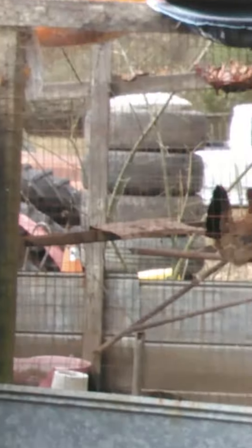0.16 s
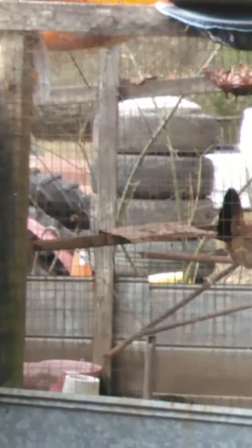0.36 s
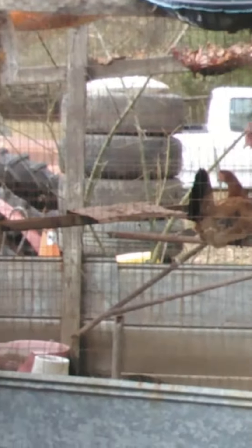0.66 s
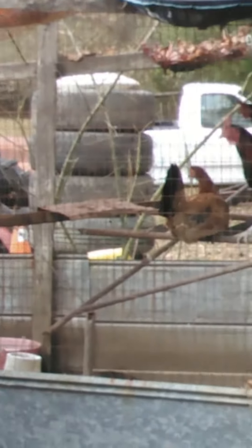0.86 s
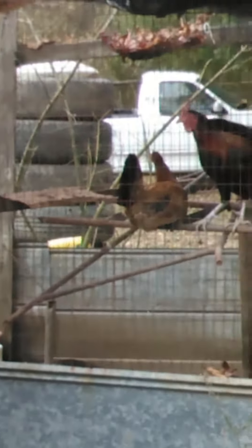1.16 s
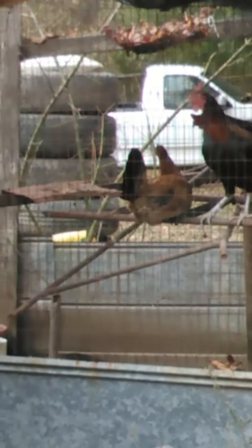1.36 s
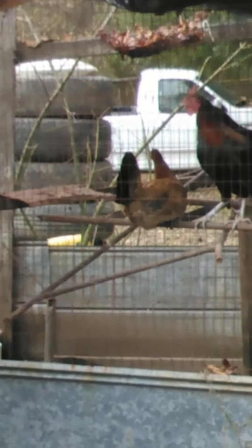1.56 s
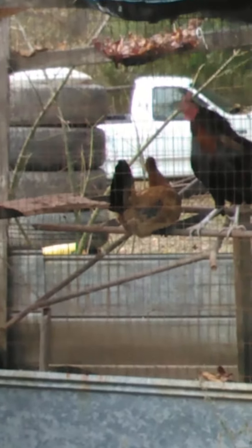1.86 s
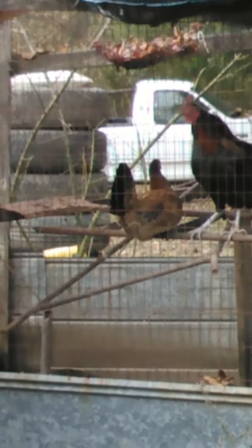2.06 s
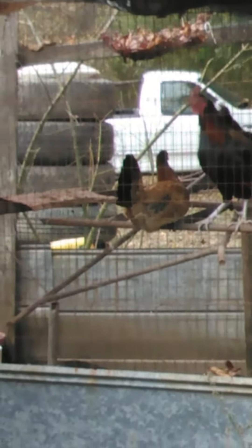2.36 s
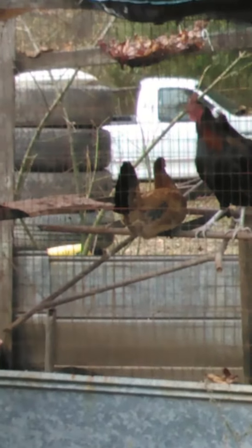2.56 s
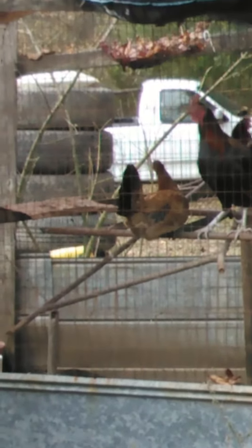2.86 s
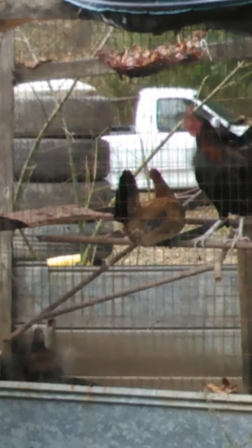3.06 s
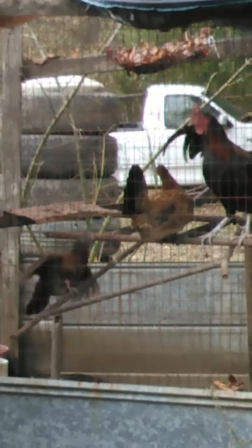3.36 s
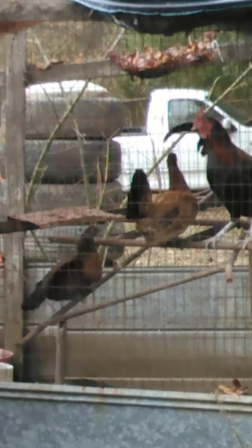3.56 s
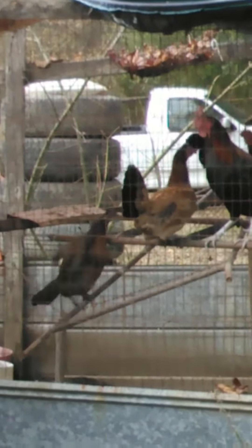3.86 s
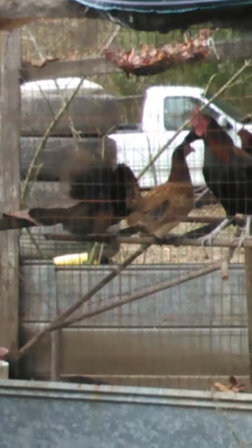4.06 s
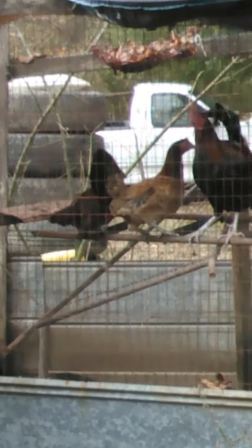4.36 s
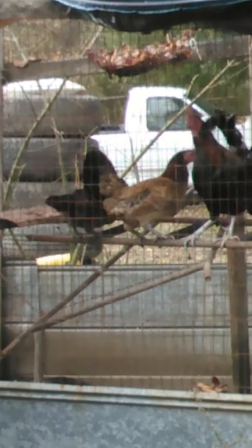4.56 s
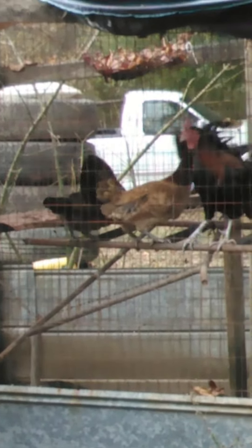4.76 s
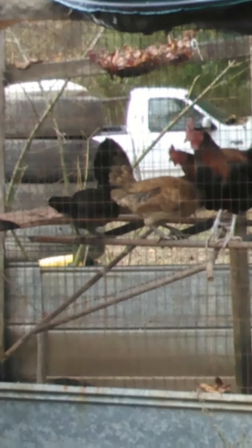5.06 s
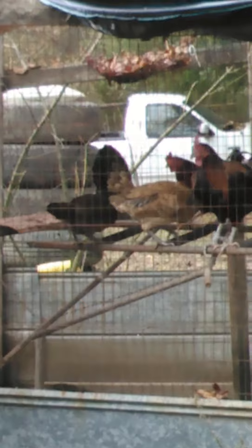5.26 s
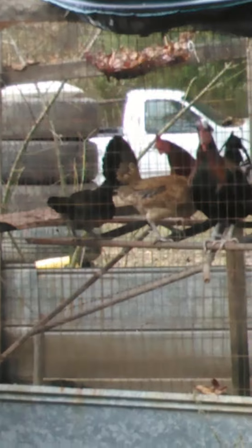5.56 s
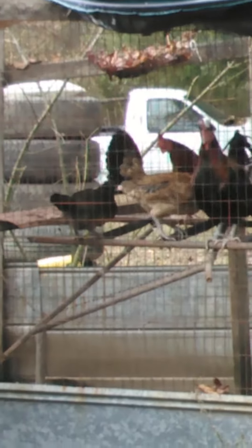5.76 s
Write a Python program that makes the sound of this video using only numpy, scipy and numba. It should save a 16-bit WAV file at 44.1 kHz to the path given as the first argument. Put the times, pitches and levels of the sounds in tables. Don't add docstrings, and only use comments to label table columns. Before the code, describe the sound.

Hens in an open wire coop with metal sides: after initial silence, hoarse flock calls and a close cackle, a long rising squawk, rustling feathers and steady clucks. A longer sinking squawk follows with a yelp and soft wing beats, then a last squawk bout, clucks and a claw knock. Phone microphone, dull treble, slight distortion, short metallic reverberation.

```python
import sys
import numpy as np
from scipy import signal
from scipy.io import wavfile
from scipy.ndimage import uniform_filter1d
from numba import njit

SR = 44100
rng = np.random.default_rng(int(sys.argv[2]) if len(sys.argv) > 2 else 0)


def int16_out(signal):
    q = np.round(np.clip(np.atleast_2d(signal).T, -1, 1) * 32767)
    wavfile.write(sys.argv[1], SR, q.astype(np.int16))


N = 261072
START_S = 0.468
PITCH_SAG = 0.04

# time in seconds, pitch in Hz, level in dB.
MOTOR_HUM = [(0.46, 85.3, -75), (0.49, 90.9, -36.5), (1.6, 90.8, -30.5), (3.48, 84.8, -60.5),
             (5.19, 90.8, -59.5), (5.72, 83.7, -59.5), (5.92, 100, -52)]
# multiple of the pitch, level in dB.
MOTOR_TONES = [(1, -3), (2, -21.5)]
# time in seconds, level in dB.
WIND_LEVEL = [(0.46, -45), (0.52, -37.5), (1.78, -36), (2.33, -43.5), (5.16, -41), (5.26, -39),
              (5.48, -39.5), (5.92, -41.5)]
# frequency in Hz, density in dB per Hz.
WIND_SPECTRUM = [(12, -25), (20, -38), (42, -7), (59, 2), (72, 0.5), (172, -11), (247, -7.5), (300, 5),
                 (390, -61.5), (660, -120)]
# time in seconds, level in dB.
YARD_LEVEL = [(.46, -31), (1.0, -36.5), (1.6, -39), (2.08, -52.5), (2.7, -52.5), (3.3, -40), (3.5, -38),
              (3.7, -40.5), (4.12, -52), (4.8, -46.5), (5.4, -53.5), (5.92, -52.5)]
# frequency in Hz, density in dB per Hz.
YARD_SPECTRUM = [(88, -59), (150, 1), (469, -4), (796, -3), (1440, -5), (1750, -17.5), (2120, -0.5),
                 (2570, -26.5), (3540, -11), (6950, -27.5), (9040, -66), (15300, -120)]

# centre in Hz, width in Hz, level in dB.
FLOCK_THROAT = [(626, 810, 15.5), (880, 120, -18.5), (1365, 470, 18.5), (1950, 94, -13), (2385, 110, 11.5),
                (3030, 550, 3), (3842, 380, 6.5), (4660, 220, -5.5)]
NEAR_THROAT = [(700, 222, 5), (1151, 93, 2), (1323, 260, 4), (2000, 360, 8.5), (2295, 97, -1.5),
               (2776, 260, -6), (3448, 484, 1), (4294, 270, -7), (5310, 284, -18)]
CLUCK_THROAT = [(698, 268, 0), (1050, 90, -2.5), (1425, 43, -6.5), (2061, 303, 3), (2270, 43, -11),
                (3230, 110, -19), (3504, 350, -10.5), (4220, 140, -12), (4640, 740, -18.5)]

# peak in seconds, fall in seconds, peak in dB, pitch in Hz, middle resonance in Hz.
HOARSE_CALLS = [(.47, .13, -12, 698, 1436), (.865, .07, -25.5, 620, 1310), (1.695, .06, -31, 543, 1144),
                (1.864, 0.05, -25, 669, 1210), (2.69, 0.073, -35.5, 506, 1013),
                (3.682, .05, -27, 650, 1260), (3.86, 0.021, -28, 470, 1294), (4.989, 0.033, -26, 699, 1280),
                (5.16, .06, -27.5, 508, 935), (5.648, .04, -32, 523.6, 1080)]
HUSKY_CALLS = [(.665, .15, -22.5, 399.6, 1370), (.81, 0.066, -25, 710, 1405), (.784, 0.047, -27, 548, 1490),
               (4.198, 0.088, -26.5, 456, 1086), (4.811, 0.045, -31, 447, 1210),
               (5.252, 0.018, -27.5, 778, 1530)]
PURE_CALLS = [(0.579, 0.055, -23, 918, 1954), (0.634, 0.092, -18.5, 628.5, 1350),
              (.975, 0.13, -25.5, 461.3, 1495), (3.788, 0.029, -20.5, 356, 1320),
              (3.955, 0.031, -27, 449, 1100), (5.881, 0.029, -31, 450.3, 1140)]
FLOCK_TEXTURES = [(.68, .52), (.43, .4), (.19, .22)]
FLOCK_BEAK_DB = [-0.3, -0.3, -1]
# peak in seconds, fall in seconds, peak in dB, first pitch in Hz, last pitch in Hz.
YELP = (3, 0.13, -9, 648.5, 740)

# start in seconds, length in seconds, level in dB, pitch in Hz, middle resonance in Hz.
CACKLE = [
    (0.604, 0.063, -15, 624.5, 2440),
    (0.689, 0.091, -18.5, 647, 2480),
    (0.767, .07, -16, 547.4, 2200),
]
# peak in seconds, fall in seconds, peak in dB, pitch in Hz.
CLUCKS = [(2.136, .065, -19, 507.8), (2.355, .065, -19, 517.7), (2.575, 0.057, -17.5, 531),
          (3.589, .04, -11.5, 619), (4.037, .06, -16.5, 539), (4.916, 0.061, -15, 643),
          (5.495, .05, -16.5, 661.4), (5.737, .045, -11.5, 687)]

# multiple of the pitch, level in dB.
GLIDE = [(.72, 780, -32.5), (.755, 806.4, -22), (.79, 728, -22), (.82, 664, -20.5), (.85, 636, -24.5)]
GLIDE_TONES = [(1, -12.5), (2, -1.5), (3, -6), (4, -11), (5, -12)]
GLIMPSE = [(1.385, 578, -21), (1.4, 555, -9.5), (1.425, 565, -6), (1.44, 572, -22.5)]
GLIMPSE_TONES = [(1, -10), (2, -11.5), (3, -2.5), (4, -8.5), (5, -2.5), (6, 3.5), (7, -5.5), (8, -11.5),
                 (9, -16.5)]
RISING = [(2.7, 584, -48), (2.74, 606.7, -31.5), (2.78, 635, -31), (2.88, 642, -28), (2.95, 619, -27.5),
          (3.15, 615.6, -21.5), (3.29, 633, -24)]
RISING_TONES = [(1, 4), (2, -44), (3, -27), (4, -2.5), (5, -9), (6, -6), (7, -32), (8, -21), (9, -32.5)]
LONG = [(3.2, 505, -36), (3.3, 518.5, -24.5), (3.42, 532, -20.5), (3.53, 533, -18.5), (3.57, 479, -20.5),
        (3.6, 467, -38)]
LONG_TONES = [(1, 0), (2, -30), (3, -24), (4, -25), (5, -27), (6, -35), (7, -36), (8, -31), (9, -30)]
ARCH = [(4.43, 471, -33.5), (4.49, 569, -22), (4.54, 577, -14.5), (4.59, 555, -24), (4.64, 452, -40)]
ARCH_TONES = [(1, -2.5), (2, -36)]
BREAK = [(4.47, 507.8, -9), (4.59, 515.7, -10.5), (4.605, 523, -10.5)]
BREAK_TONES = [(1, -14), (2, 0), (3, 0.5), (4, 12), (5, 1.5), (6, 6.5), (7, 2), (8, 3), (9, -10.5),
               (10, -54), (11, -17.5), (12, -74.5)]
CREST = [(4.585, 525.7, -14), (4.645, 527.6, -7), (4.68, 483, -23)]
CREST_TONES = [(1, -32.5), (2, -2), (3, -6.5), (4, -17.5), (5, -3.5), (6, -1), (7, -9.5), (8, -15.5),
               (9, -20), (10, -55), (11, -39.5), (12, -74)]

# start in seconds, length in seconds, level in dB.
SQUAWK_LEADS = [
    (1.028, 0.099, -17.5),
    (2.772, 0.092, -16),
    (4.236, .105, -18.5),
]
# full voice in seconds, hold in seconds, level in dB, first pitch in Hz, last pitch in Hz.
SQUAWKS = [
    (1.129, 0.26, -8.9, 541.7, 560.9),
    (1.437, 0.043, -11, 559.6, 569),
    (2.864, .338, -9, 509.5, 494.8),
    (4.346, .13, -9.5, 503.6, 505.2),
    (4.663, 0.023, -11.5, 507.7, 448),
]
# time in seconds, beak in dB per octave, middle resonance in Hz.
POSTURE = [(1.1, 3.5, 2000), (1.25, 5, 1960), (1.38, 4.5, 1880), (1.451, 7.5, 1900), (1.52, 4.5, 1950),
           (2.84, 2.5, 2048), (2.95, 4.5, 1864), (3.06, 2.5, 1838), (3.14, 6.5, 1730), (3.2, 1, 1927),
           (4.33, 4, 2050), (4.4, 4.5, 1913), (4.47, 6, 1830), (4.651, 5.5, 2000), (4.72, 4, 1823)]

# start in seconds, peak in dB, centre in Hz, T60 in seconds.
RUSTLE = [(1.6138, -26.5, 4020, 0.078), (1.6298, -22.5, 3520, 0.04), (1.629, -19, 4240, 0.12),
          (1.7424, -26, 3940, 0.13), (1.788, -32.5, 3930, 0.037), (1.8484, -19, 3290, 0.071),
          (3.717, -36.5, 4540, 0.18), (5.095, -46, 5200, 0.11), (5.1746, -33.5, 3820, 0.099),
          (5.2839, -16, 2990, 0.064), (5.456, -26, 3230, 0.13), (5.637, -29, 2700, .15),
          (5.638, -31.5, 3900, 0.14), (5.285, -32, 3850, .25)]
# start in seconds, peak in dB, centre in Hz, T60 in seconds.
WING_BEATS = [(3.219, -32, 252, 0.12), (3.557, -22.5, 263, 0.25), (3.63, -32, 323, 0.27),
              (3.705, -24, 316, 0.23), (3.758, -17, 266, 0.083), (3.918, -36, 376, 0.35),
              (4.285, -20.5, 256, 0.31)]
# start in seconds, peak in dB, centre in Hz, T60 in seconds.
FOOT_KNOCK = [
    (5.2805, -16, 1050, 0.16),
    (5.2809, -24, 420, 0.12),
]


def from_db(db):
    return 10 ** (np.asarray(db) / 20)


def rms_one(x):
    return x / np.sqrt(np.mean(x ** 2) + 1e-20)


def in_span(rows):
    s, *columns = np.transpose(rows)
    at = np.arange(int(s[0] * SR), min(int(s[-1] * SR), N))
    ends = np.clip(np.minimum(at - at[0], at[-1] - at) / (0.007 * SR), 0, 1)
    return at, ends, [np.interp(at / SR, s, c) for c in columns]


def drift(size, rate_hz, count=1):
    r = np.exp(-32 * np.pi * rate_hz / SR)
    white = rng.standard_normal((count, size // 16 + 601))
    slow = signal.lfilter([1], [1, -2 * r, r * r], white)[:, 600:]
    slow = slow * np.sqrt((1 - r * r) ** 3 / (1 + r * r))
    smooth = uniform_filter1d(np.repeat(slow, 16, axis=1), size=16)
    return np.squeeze(smooth[:, :size])


def steady_tone(rows, tones, wobble=0.0016, shimmer_db=1.0):
    at, ends, (hz, level_db) = in_span(rows)
    turn = 2 * np.pi * np.cumsum(hz * (1 + wobble * drift(len(at), 38))) / SR
    sound = 0
    for k, db in tones:
        line_db = db + shimmer_db * np.sqrt(k) * drift(len(at), 14)
        sound = sound + from_db(line_db) * np.cos(k * turn + rng.uniform(0, 4.2))
    out = np.zeros(N)
    out[at] = rms_one(sound) * from_db(level_db) * ends
    return out


def motor():
    return steady_tone(MOTOR_HUM, MOTOR_TONES, wobble=0.014, shimmer_db=4.0)


def patchy_noise(level, spectrum, patchy_db):
    hz, db = np.transpose(spectrum)
    edges_hz = hz[0] * 2 ** np.arange(0, np.log2(hz[-1] / hz[0]), 0.5)
    white = rng.standard_normal((2, N))
    out = 0
    for k, (low, high) in enumerate(zip(edges_hz, edges_hz[1:])):
        sos = signal.butter(2, [low, high], "band", fs=SR, output="sos")
        band = signal.sosfilt(sos, white[k % 2])
        band_db = np.interp(np.log(low * high) / 2, np.log(hz), db)
        out = out + band * from_db(band_db + patchy_db * drift(N, 5.14))
    s, level_db = np.transpose(level)
    return rms_one(out) * from_db(np.interp(np.arange(N) / SR, s, level_db))


def wind():
    return patchy_noise(WIND_LEVEL, WIND_SPECTRUM, patchy_db=1.5)


def yard():
    return patchy_noise(YARD_LEVEL, YARD_SPECTRUM, patchy_db=2.5)


@njit
def windpipe(x, modes, resonance_hz, beak_db, middle_hz, rate):
    out = np.zeros(len(x))
    for k in range(len(modes)):
        r = np.exp(-np.pi * modes[k, 1] / rate)
        octaves = np.log2(modes[k, 0] / middle_hz)
        moves = 1. if abs(octaves) < .3 else .25
        w = 2 * np.pi * modes[k, 0] * (resonance_hz / middle_hz) ** moves / rate
        y = x
        for twice in range(2):
            u, y = y, np.zeros(len(x))
            for i in range(2, len(x)):
                drive = (1 - r * r) / 2 * (u[i] - u[i - 2])
                y[i] = drive + 2 * r * np.cos(w[i]) * y[i - 1] - r * r * y[i - 2]
        out += y * 10 ** ((modes[k, 2] + beak_db * octaves) / 20)
    return out


def call(rows, voice, throat, middle_hz, shape=None):
    at, ends, (level_db, *moving) = in_span(rows)
    size = len(at)
    beak_db, resonance_hz = moving or np.outer(shape, np.ones(size))
    first_hz, last_hz, cycles, beat, rough = voice
    resonance_hz = resonance_hz * (1 + 0.02 * drift(size, 15))
    beat_hz = np.linspace(first_hz, last_hz, size) / cycles * (1 + 0.025 * rough * drift(size, 75))
    turn = 2 * np.pi * np.cumsum(beat_hz) / SR
    k = np.arange(1, int(6500 * cycles / first_hz))[:, None]
    share = np.where(k % cycles, beat, 1) * from_db(9 * rough * drift(size, 25, count=len(k)))
    slip = rng.uniform(0, 2.5, k.shape) + 3 * rough * drift(size, 24, count=len(k))
    pulses = rms_one(np.sum(share * np.cos(k * turn + slip), axis=0))
    air = rms_one(rng.standard_normal(size) * (4.5 + np.cos(turn)))
    source = np.sqrt(1 - 0.85 * rough) * pulses + np.sqrt(0.85 * rough) * air
    beak_db = beak_db + 0.14 * (level_db - level_db.max())
    sound = windpipe(source, np.array(throat, float), resonance_hz, beak_db, middle_hz, SR)
    even = np.sqrt(uniform_filter1d(sound ** 2, size=1300, mode="reflect") + 1e-12)
    s, root = np.transpose([(r[0], from_db(r[1] / 2)) for r in rows])
    swell = np.interp(at / SR, s, root) ** 2
    out = np.zeros(N)
    out[at] = sound / even * swell * ends
    return out


def flock():
    rise_s, start_db, end_db = 0.022, -14, -22
    beat_rate_hz, middle_hz = 175, 1350.
    alarm_db, calming_s = 8, 1.3
    yelp_beak_db, yelp_neck_hz = 8.5, 1390
    out = 0
    tables = (HOARSE_CALLS, HUSKY_CALLS, PURE_CALLS)
    for table, (beat, rough), beak_db in zip(tables, FLOCK_TEXTURES, FLOCK_BEAK_DB):
        for s, fall_s, db, hz, neck_hz in table:
            rows = [(s - rise_s, db + start_db), (s, db), (s + fall_s, db + end_db)]
            voice = (hz, hz * (1 - PITCH_SAG / 2), round(hz / beat_rate_hz), beat, rough)
            stirred_db = alarm_db * np.exp(-(s - START_S) / calming_s)
            out += call(rows, voice, FLOCK_THROAT, middle_hz, (beak_db + stirred_db, neck_hz))
    s, fall_s, db, first_hz, last_hz = YELP
    rows = [(s - rise_s, db + start_db), (s, db), (s + fall_s, db + end_db)]
    voice = (first_hz, last_hz, 4, 0.3, 0.3)
    return out + call(rows, voice, FLOCK_THROAT, middle_hz, (yelp_beak_db, yelp_neck_hz))


def cackle():
    beak_db, swell_db, fade_db = 4.5, -4, -9
    out = 0
    for s, length_s, db, hz, neck_hz in CACKLE:
        rows = [(s, db + swell_db), (s + 0.52 * length_s, db), (s + length_s, db + fade_db)]
        voice = (hz, hz * (1 - PITCH_SAG / 2), 4, 0.4, 0.27)
        out += call(rows, voice, CLUCK_THROAT, 2030., (beak_db, neck_hz))
    return out


def clear_notes():
    notes = [(GLIDE, GLIDE_TONES), (GLIMPSE, GLIMPSE_TONES), (RISING, RISING_TONES), (LONG, LONG_TONES),
             (ARCH, ARCH_TONES), (BREAK, BREAK_TONES), (CREST, CREST_TONES)]
    return sum(steady_tone(rows, tones) for rows, tones in notes)


def squawks():
    attack_s, release_s, start_db, end_db = 0.02, 0.028, -16.5, -24
    beat_rate_hz = 155
    lead_hz, lead_beak_db, lead_neck_hz = 681, 1.5, 2026
    out = 0
    for s, length_s, db in SQUAWK_LEADS:
        rows = [(s, db - 9.5), (s + 0.3 * length_s, db), (s + length_s, db - 5.5)]
        voice = (lead_hz, lead_hz, 2, 0.8, 0.4)
        out += call(rows, voice, CLUCK_THROAT, 2030., (lead_beak_db, lead_neck_hz))
    when, beak_db, neck_hz = np.transpose(POSTURE)
    for s, hold_s, db, first_hz, last_hz in SQUAWKS:
        t = np.r_[s - attack_s, np.linspace(s, s + hold_s, 12), s + hold_s + release_s]
        level_db = db + np.r_[start_db, np.zeros(12), end_db]
        rows = np.c_[t, level_db, np.interp(t, when, beak_db), np.interp(t, when, neck_hz)]
        beat, rough = (0.9, 0.38) if hold_s > 0.08 else (0.45, 0.28)
        voice = (first_hz, last_hz, round(last_hz / beat_rate_hz), beat, rough)
        out += call(rows, voice, NEAR_THROAT, 2000.)
    return out


def puffs(events, octaves, rise_s):
    out = np.zeros(N)
    t = np.arange(SR // 4) / SR
    for s, peak_db, hz, t60_s in events:
        edges_hz = hz * 2 ** np.array([-octaves, octaves])
        band = signal.butter(2, edges_hz, "band", fs=SR, output="sos")
        burst = rms_one(signal.sosfilt(band, rng.standard_normal(len(t))))
        decay = from_db(peak_db - 8.5 - 60 * t / max(t60_s, 0.01))
        burst = burst * (1 - np.exp(-t / rise_s)) * decay
        at = int(s * SR)
        out[at:at + len(t)] += burst[:N - at]
    return out


def rustle_and_knock():
    return puffs(RUSTLE + FOOT_KNOCK, octaves=0.26, rise_s=0.00075)


def clucks():
    rise_s, start_db, end_db, neck_hz = 0.035, -32, -27, 2026
    low_hz, open_hz, beat_loss_per_hz, rough = 520, 600, 0.002, 0.37
    shut_beak_db, open_beak_db = 0, 0.5
    out = 0
    for s, fall_s, db, hz in CLUCKS:
        rows = [(s - rise_s, db + start_db), (s, db), (s + fall_s, db + end_db)]
        beat = 0.9 - beat_loss_per_hz * (hz - low_hz)
        voice = (hz, hz * (1 - PITCH_SAG), 4, beat, rough)
        throat, beak_db = (NEAR_THROAT, open_beak_db) if hz > open_hz else (CLUCK_THROAT, shut_beak_db)
        out += call(rows, voice, throat, 2030., (beak_db, neck_hz))
    return out


def wings():
    return puffs(WING_BEATS, octaves=0.27, rise_s=0.0053)


def coop(x):
    t60_s, cut_hz, level_db = 0.33, 5500, -19
    t = np.arange(int(0.6 * SR)) / SR
    tail = rng.standard_normal(len(t)) * from_db(-60 * t / t60_s) * (t > 0.006)
    tail = signal.sosfilt(signal.butter(1, cut_hz, fs=SR, output="sos"), tail)
    tail = tail / np.sqrt(np.sum(tail ** 2))
    return x + from_db(level_db) * signal.fftconvolve(x, tail)[:N]


def scene():
    outside = motor() + wind() + yard()
    hens = flock() + cackle() + clear_notes() + squawks() + clucks()
    return (coop(hens + rustle_and_knock() + wings()) + outside)[None]


def roll_off(x):
    return signal.sosfilt(signal.butter(12, 7100, fs=SR, output="sos"), x)


def record(dry):
    soft_top, cut_hz, full_scale = 1.566, 6430, 1.26
    x = soft_top * np.tanh(dry / soft_top)
    x = signal.sosfilt(signal.butter(10, cut_hz, fs=SR, output="sos"), x)
    x = np.clip(x, -full_scale, full_scale)
    return roll_off(x * (np.arange(N) >= START_S * SR))


dry = scene()
out = record(dry)
int16_out(out)
```